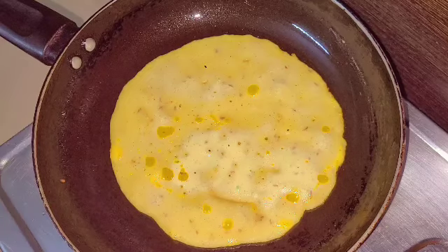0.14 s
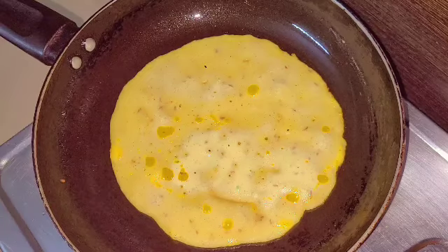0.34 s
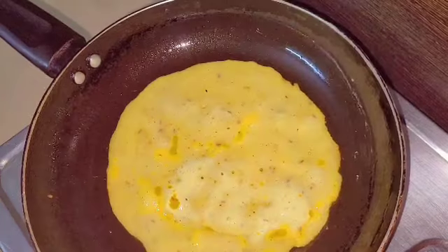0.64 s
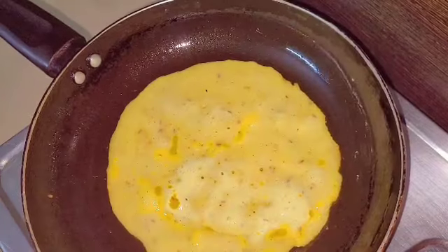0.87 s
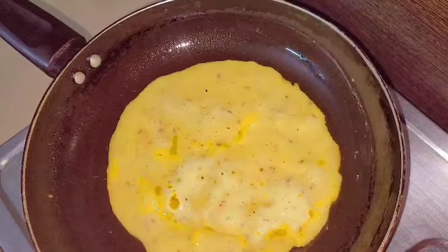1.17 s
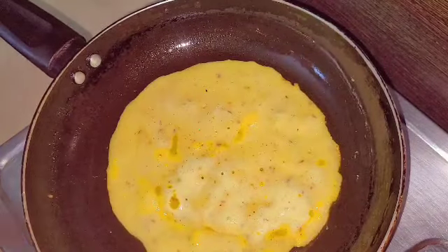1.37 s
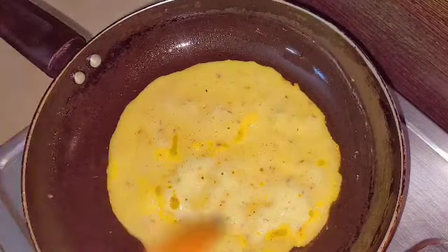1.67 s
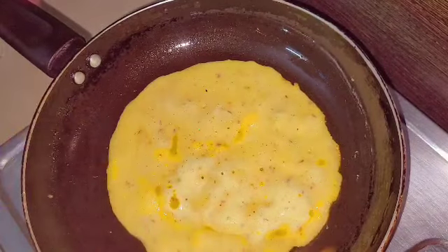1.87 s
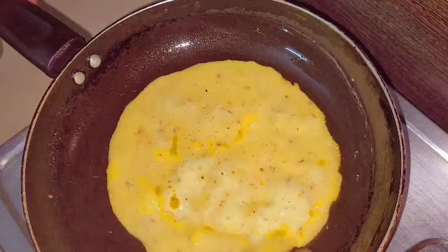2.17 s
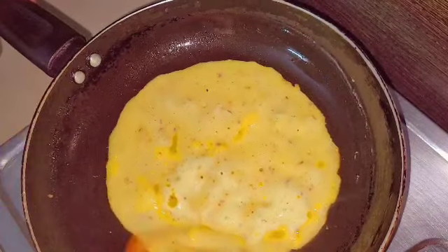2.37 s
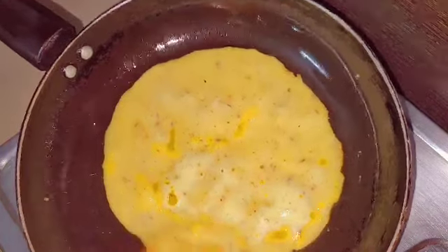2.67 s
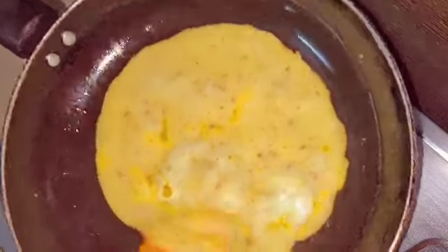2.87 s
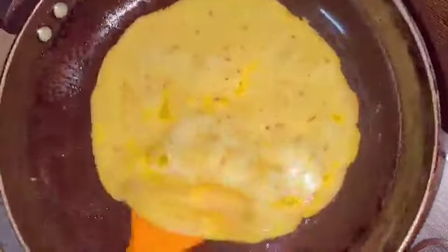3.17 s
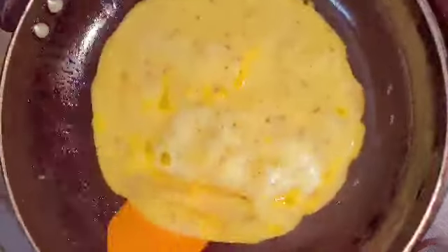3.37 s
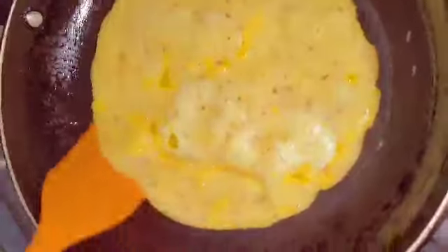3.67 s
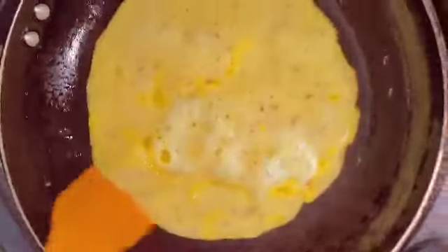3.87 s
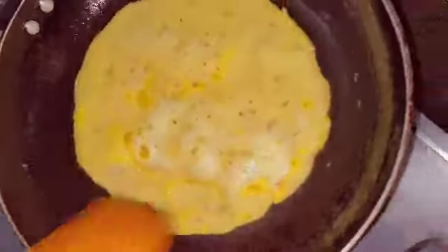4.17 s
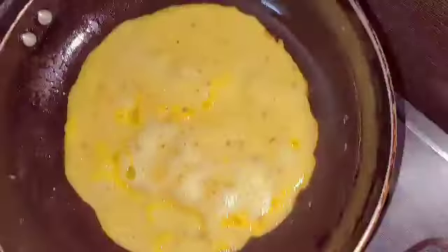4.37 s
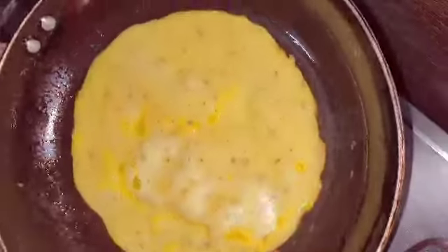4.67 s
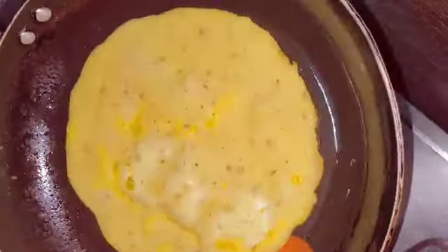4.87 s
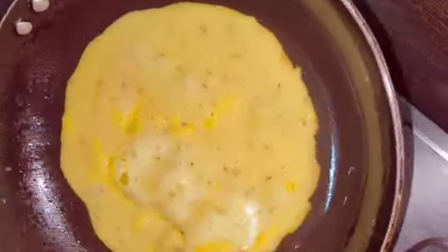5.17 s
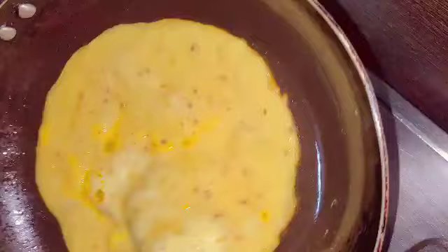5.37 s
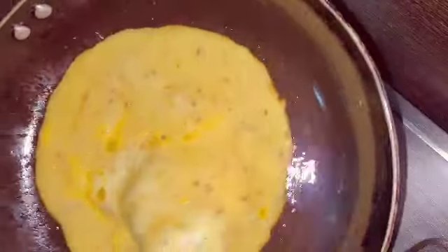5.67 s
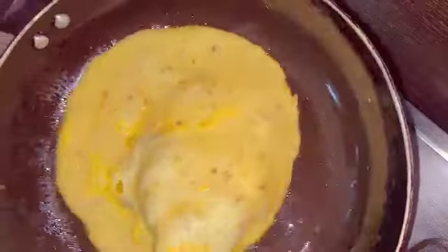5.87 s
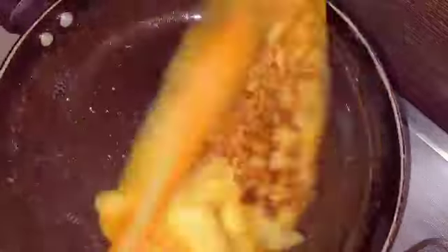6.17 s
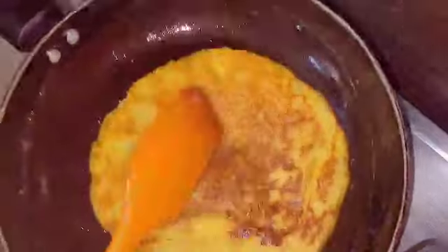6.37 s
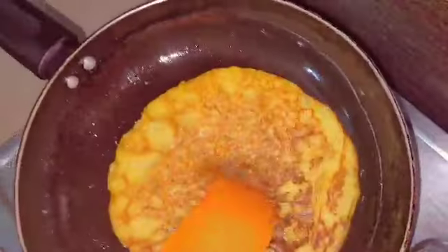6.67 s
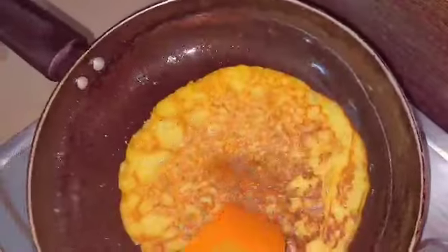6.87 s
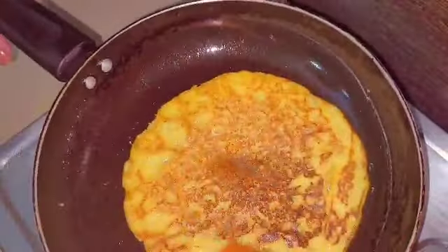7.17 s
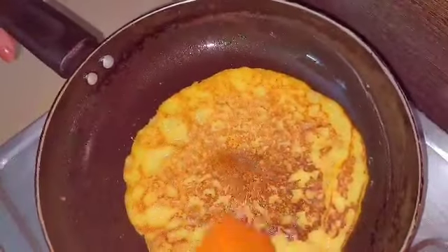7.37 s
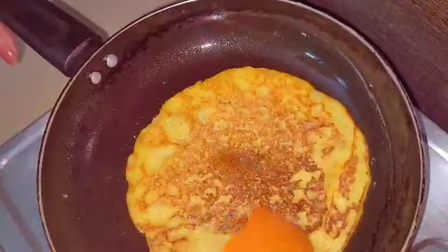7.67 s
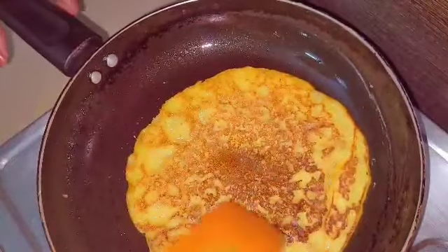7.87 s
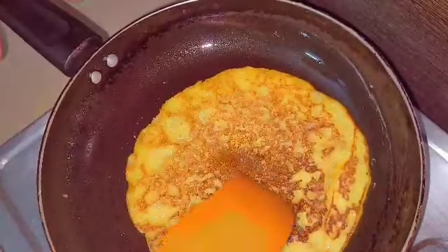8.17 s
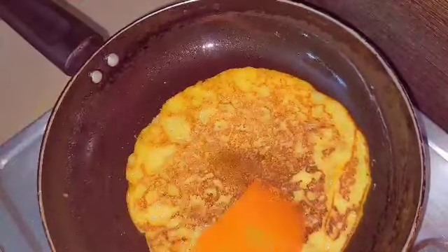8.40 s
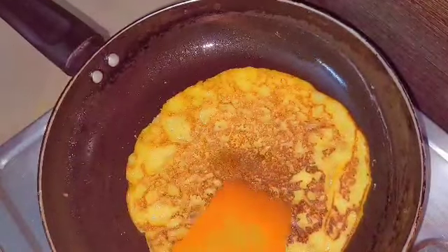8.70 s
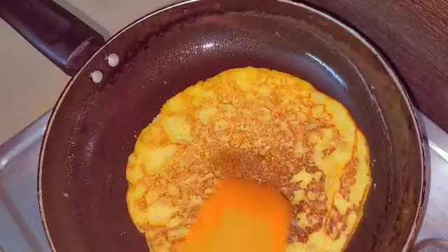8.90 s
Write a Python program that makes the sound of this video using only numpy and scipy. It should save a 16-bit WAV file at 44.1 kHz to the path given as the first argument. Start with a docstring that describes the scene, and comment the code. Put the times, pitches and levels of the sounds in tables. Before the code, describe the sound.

A pancake sizzles and spits in a pan, surges into a dense hiss under pressure, slaps over wetly, then settles to soft frying.

```python
"""Frying and flipping a pancake

A pancake fries in a little oil in a nonstick pan, heard from close above in a kitchen.
Bursting steam bubbles are tiny noise snaps in clusters; spits of oil are brighter snaps with faint puffs.
A spatula squeezes out a dense hiss, lifts the pancake and slaps it over: a quick run of noise smacks.
Decaying sines make the pan's knocks on the stove; filtered noise makes the burner's rumble below."""
import sys
import numpy as np
from scipy import signal
from scipy.fft import rfft, irfft, next_fast_len
from scipy.io import wavfile
from scipy.ndimage import uniform_filter1d, map_coordinates

SR = 44100
rng = np.random.default_rng(int(sys.argv[2]) if len(sys.argv) > 2 else 0)


def wrap_up_sound(samples):
    """Save the sound to the file named by the first command line argument, as 16-bit audio."""
    columns = np.atleast_2d(samples).T
    # keep every value between -1 and 1, then stretch to whole-number steps
    tamed = np.clip(columns, -1, 1)
    steps = np.round(tamed * 32767).astype(np.int16)
    wavfile.write(sys.argv[1], SR, steps)


N = 398663  # length [samples]

# the loudest spits of oil, before the gains of their parts: (time [s], level [dB])
SPITS = [(0.1713, -30), (0.531, -27), (0.638, -21), (0.7086, -24), (0.8321, -21), (0.9153, -22),
         (1.0365, -22), (1.0562, -25), (1.127, -26), (1.2055, -27), (1.2896, -23), (1.3868, -23),
         (1.4425, -26), (1.5121, -24), (1.0135, -28), (1.6112, -25), (1.6507, -20), (1.6631, -22),
         (1.882, -24), (1.9117, -15), (1.9736, -23), (2.0133, -24), (2.0258, -23), (2.1375, -21),
         (2.1639, -22), (2.3091, -23), (2.3299, -18), (2.3589, -22), (2.7375, -20), (2.8795, -21),
         (2.8455, -16), (2.9669, -24), (2.9784, -28), (3.056, -26), (3.2706, -28), (3.2914, -22),
         (3.3445, -18), (3.362, -19), (3.4846, -16), (3.6719, -11), (3.7211, -13), (3.9942, -16),
         (4.056, -12), (4.4372, -13), (8.7415, -29), (4.7504, -15), (4.7975, -17), (4.931, -18),
         (5.0811, -19), (5.2093, -18), (5.4453, -18), (5.5295, -22), (5.7617, -12), (5.7764, -16),
         (5.8004, -13), (5.827, -18), (5.9867, -23), (6.3199, -11), (7.6955, -27), (7.7647, -26),
         (7.9627, -24), (8.2778, -24), (8.3282, -26), (8.613, -27), (8.6486, -21), (8.8381, -25),
         (8.94, -22), (8.957, -24)]
# the spatula's weight on the pancake: (time [s], pressure [0-1])
PRESSURE = [(1.5, 0), (2.5, 0.31), (3.2, .35), (3.7, 0.9), (4.3, 0.95), (4.8, 0.61), (6.0, .55),
            (7.2, 0.48), (8.0, 0.31)]
LAND_S = 6.265  # the turned pancake lands in the pan
CATCH_S = 0.02  # time constant with which the sizzle comes up


def sizzle():
    """The same bubbles crackle at the rim, hiss where squeezed, and sound muffled or blub under the pancake."""
    # how snugly the pancake lies on the pan: (time [s], bubbling under it relative to the crackle [dB])
    contact = [(1.4, -4.5), (2.3, -7), (2.85, -9.5), (3.55, -5), (4.1, -8), (5.3, -8.5), (5.95, -12),
               (6.25, -14), (6.42, -3), (9.0, -7.5)]
    # steam pockets change as the pancake is moved; a negative depth is a lift:
    # (time [s], steam resonance [Hz], dip [Hz], depth of the dip [dB], crackle resonance [Hz])
    pockets = [(1.5, 5400, 4200, 3, 9050), (2.4, 4730, 7000, 4, 10200), (2.9, 5430, 6960, 3.5, 12100),
               (3.55, 5530, 3400, 3.5, 10690), (4.0, 5600, 3780, 6, 10690), (4.17, 5350, 3100, -0.5, 9603),
               (4.7, 4930, 7900, 3.5, 12100), (5.0, 5294, 6994, 5, 11990), (5.75, 5805, 3506, -1.5, 11950),
               (6.5, 5300, 3413, 2, 11100), (8.4, 5200, 6700, 3, 11400)]
    # colours of the bubbles: (frequency [Hz], relative level [dB])
    crackle_colour = [(2000, -34), (5000, -4.5), (7300, -7), (8800, -2), (10500, -1.5), (15300, 0.5)]
    steam_colour = [(1000, -54), (2200, -12), (3000, 1), (4000, 1.5), (5600, -1), (7500, 0), (9500, -1),
                    (14000, -16)]
    muffled_colour = [(200, -26), (550, -30), (680, -11), (900, -2), (1130, -3.5), (1500, 3), (2200, 3.5),
                      (2700, 3), (8000, -22)]
    blub_colour = [(100, -12.5), (220, -1), (320, 4), (480, -2), (700, -10.5), (1500, -33.5)]

    crackle_db, rush, touch = frying()
    # more steam = more hiss, more bubbles, less clustering: [at rest, at full rush]
    steam_db = np.interp(rush, [0, 1], [-9, -2])
    bubbles_per_s = np.interp(rush, [0, 1], [1700, 6500])
    cluster_db = np.interp(rush, [0, 1], [12.5, 2])
    # bare oil keeps only a share of the clustering
    cluster_db = cluster_db * np.maximum(touch, 0.21)

    under_db = crackle_db + curves(contact)[0]
    pressed_db = -4 * curves(PRESSURE)[0]
    flipped_db = 3.5 * (1 - fade(LAND_S, CATCH_S))
    blub_db = under_db - 6 + pressed_db + flipped_db

    steam_hz, dip_hz, dip_db, crackle_hz = curves(pockets)
    rim, squeezed, trapped, deep = bubbles(
        bubbles_per_s, cluster_db, spread_db=6.5, fizz=0.45, pop_rate=65, pop_db=23.5, count=4)
    crackle = in_pan(rim * amp(crackle_db - 1.0), crackle_colour)
    crackle = pocket(crackle, crackle_hz, dip_hz, dip_db, width_hz=2600, lift_db=3.5, patchy_db=2.1)
    hiss = in_pan(squeezed * amp(crackle_db + steam_db - 3.5), steam_colour)
    steam = pocket(hiss, steam_hz, dip_hz, dip_db, width_hz=1020, lift_db=5.5, patchy_db=1.68)
    under = in_pan(trapped * amp(under_db - 1.0), muffled_colour)
    blubs = in_pan(deep * amp(blub_db), blub_colour)
    return crackle + steam + under + blubs


def frying():
    """Strength of the frying (dB), rush of steam (0-1) and the pancake's touch on the pan (0-1)."""
    # the first side on the hot pan: (time [s], strength of the frying [dB])
    first_side_db = [(0.55, -36), (1.5, -38), (2.0, -34), (2.24, -37.5), (2.45, -34), (2.72, -26.5),
                     (2.87, -34), (3.02, -42.5), (3.33, -38.5), (3.35, -29), (4.3, -27.5), (5.2, -28.5),
                     (5.5, -31.5), (5.98, -32.5)]
    # each shove of the spatula presses out a surge of sizzle: (time [s], strength [dB], half length [s])
    shoves = [(2.334, -29, 0.029), (3.662, -22.5, 0.14), (4.11, -25, 0.3), (5.312, -25.5, 0.042),
              (5.706, -28, 0.094), (7.72, -35.5, 0.036), (8.382, -36, 0.065)]
    jump_s = 0.499  # the faint sizzle jumps up to full level
    lift_s, release_s = 5.99, 0.024  # the pancake leaves the pan; time constant of the fall
    bare_db = -52  # oil simmering alone
    flash_db, flash_s = -34, 0.045  # the raw side flashes to steam
    wet_db, dry_s, settled_db = -29, 0.8, -39  # then it dries and settles
    wet_rush = 0.9  # wet batter drives steam as pressure does

    t = np.arange(N) / SR
    first = (1 - fade(jump_s, CATCH_S)) * fade(lift_s, release_s)
    second = 1 - fade(LAND_S, CATCH_S)
    wet = fade(LAND_S, dry_s)

    shove_power = sum((amp(db) * np.exp(-((t - s) / length) ** 2)) ** 2 for s, db, length in shoves)
    first_power = first ** 2 * amp(curves(first_side_db)[0]) ** 2
    raw_power = (amp(flash_db) * fade(LAND_S, flash_s)) ** 2 + (amp(wet_db) * wet) ** 2
    second_power = second ** 2 * (raw_power + amp(settled_db) ** 2)
    power = amp(bare_db) ** 2 + first_power + shove_power + stirring() + second_power

    touch = np.clip(first + second, 0, 1)
    rush = np.clip(touch * curves(PRESSURE)[0] + wet_rush * second * wet, 0, 1)
    return 10 * np.log10(power), rush, touch


def stirring():
    """Power of the small bubbles that each spit sets off in the oil around it."""
    relative_db, decay_s = -13.5, 0.007  # level against the spit's table level; time constant of the power
    s, db = np.transpose(SPITS)
    moments = np.bincount(np.round(s * SR).astype(int), amp(db + relative_db) ** 2, N)
    return signal.lfilter([1], [1, -np.exp(-1 / (decay_s * SR))], moments)


def bubbles(rate, cluster_db, spread_db, fizz, pop_rate, pop_db, count):
    """Several streams of rms 1 that share the bubbles' moments and sizes, each with its own snap shapes."""
    starts = np.flatnonzero(rng.random(N) < rate / SR)
    sizes = amp(spread_db * np.minimum(rng.standard_normal(N), 2.3))[starts]
    common, *own = [flurries(cluster_db, rate=75, life=0.0036) for _ in range(count + 1)]
    share = 0.71  # share of the flurries common to all streams

    # now and then a bigger bubble stands out as a dry click, most of all where the boiling is sparse
    pops = np.flatnonzero(rng.random(N) < pop_rate / SR)
    pop_sizes = amp(pop_db - 11.0 * np.sqrt(rng.random(N)))
    pop_sizes = (pop_sizes * np.sqrt(rate.min() / rate))[pops]

    streams = []
    for alone in own:
        surge = np.sqrt(share * common ** 2 + (1 - share) * alone ** 2)
        snaps = unit(bursts(starts, sizes, life=0.00016))
        x = surge * (snaps + fizz * rng.standard_normal(N))
        # even out the slow level before the clicks are added
        x = x / np.sqrt(np.abs(uniform_filter1d(x * x, size=3600)) + 1e-9)
        streams.append(unit(x + bursts(pops, pop_sizes, life=0.0001)))
    return streams


def flurries(cluster_db, rate, life):
    """Loudness of little flurries of bubbles that start at once and die away."""
    triggers = (rng.random(N) < rate / SR) * rng.uniform(0.25, 2.6, N)
    activity = signal.lfilter([1], [1, -np.exp(-1 / (life * SR))], triggers)
    return np.sqrt(1 + activity * np.abs(amp(cluster_db) ** 2 - 1))


def bursts(starts, sizes, life, size=48):
    """Each bursting bubble is a tiny noise snap of its own shape, dying away with time constant life (s)."""
    snaps = rng.standard_normal((len(starts), size)) * np.exp(-np.arange(size) / SR / life)
    snaps *= (sizes / np.linalg.norm(snaps, axis=1))[:, None]
    places = starts[:, None] + np.arange(size)
    return np.bincount(places.ravel(), snaps.ravel(), N + size)[:N]


def pocket(x, pitch, dip_hz, dip_db, width_hz, lift_db, patchy_db):
    """A moving resonance and a moving dip, plus patches of colour as the boiling shifts from spot to spot."""
    hz, t, z = signal.stft(x, SR, nperseg=128)
    centre, dip, depth_db = (np.interp(t, np.arange(N) / SR, c) for c in (pitch, dip_hz, dip_db))
    # smooth random values over frequency and time
    patch_shape = np.outer(signal.windows.hann(7), signal.windows.hann(90))
    patches = unit(signal.oaconvolve(rng.standard_normal(z.shape), patch_shape, "same"))
    shape_db = lift_db * bell(hz[:, None], centre, width_hz)
    shape_db = shape_db - depth_db * bell(hz[:, None], dip, 0.42 * dip)
    return signal.istft(z * amp(shape_db + patchy_db * patches), SR, nperseg=128)[1][:N]


def spits():
    """Each spit is a bright snap with a faint puff; trapped steam breaks through the batter in louder puffs."""
    # hollow puffs of steam through the batter, before the puff gain: (time [s], level [dB])
    batter_puffs = [(0.532, -31), (0.8323, -25.5), (1.387, -29), (2.026, -25), (3.672, -20), (4.056, -24),
                    (5.081, -27), (5.8, -28), (8.838, -29)]
    # colour of the spits: (frequency [Hz], relative level [dB])
    spit_colour = [(100, -22), (400, -4), (1100, -3), (1800, 3), (3000, -1), (10000, 0)]
    snap_gain_db, spit_puff_db = 15, -17  # against the spit's table level
    puff_gain_db, puff_t60_s = 4, 0.027  # for both kinds of puff

    s, db = np.transpose(SPITS)
    snaps = filtered(spit(s, db + snap_gain_db), 2, 3200, "high")
    puffs, t = np.zeros(N), np.arange(SR // 16) / SR
    for start, puff_db in list(zip(s, db + spit_puff_db)) + batter_puffs:
        steam = amp(-60 * t / puff_t60_s) * rng.standard_normal(len(t))
        skin = 8 * (t == 0)  # a one-sample click opens the puff
        add(puffs, start, amp(puff_db + puff_gain_db) * (skin + steam))
    puffs = filtered(puffs, 2, (700, 2650), "band")
    return in_pan(snaps + puffs, spit_colour)


def spit(s, db):
    """A big bubble snaps and throws a few droplets that tick for some milliseconds."""
    moments = np.round(s * SR).astype(int)
    snaps = np.bincount(moments, amp(db), N) + bursts(moments + 2, amp(db + 2), life=0.0005)
    flight = rng.exponential(0.003, (len(s), 6))  # delays of six droplets [s]
    starts = np.minimum(np.round((s[:, None] + flight) * SR).astype(int), N - 1)
    # later droplets are softer
    sizes = amp(db[:, None] - 5 - 60 * flight / 0.05)
    return snaps + bursts(starts.ravel(), sizes.ravel(), life=0.0003)


def slap():
    """Wet batter hits the pan in a quick run of smacks, each a sharp edge with a short splash."""
    # the pancake lands fold by fold, before colouring: (time [s], level [dB])
    folds = [(6.2665, -20.5), (6.2733, -9.5), (6.280, -11), (6.284, -13), (6.289, -10)]
    # colour of the wet smack: (frequency [Hz], relative level [dB])
    splat_colour = [(30, -26), (120, -8), (270, 2.5), (500, -7.5), (740, -13.5), (960, 0), (1600, -6),
                    (3000, -4), (7000, -16), (15500, -12.5)]
    x, t = np.zeros(N), np.arange(SR // 10) / SR
    edge = amp(-60 * t / 0.0049)
    splash = 0.77 * amp(-60 * t / 0.046)
    for s, db in folds:
        add(x, s, amp(db) * rng.standard_normal(len(t)) * (edge + splash))
    return in_pan(x, splat_colour)


def rubs():
    """The blade drags softly over the cooked side: noise under a smooth swell with an uneven grip."""
    # soft strokes of the spatula, before colouring: (time [s], level [dB], half length [s])
    strokes = [(6.774, -37, 0.094)]
    t = np.arange(N) / SR
    pressure = sum(amp(db) * np.exp(-((t - s) / length) ** 2) for s, db, length in strokes)
    grip = amp(3 * wobble(60))
    colour = [(100, -2), (300, 5.0), (550, -14.5), (4000, -40)]  # (frequency [Hz], relative level [dB])
    return in_pan(pressure * grip * rng.standard_normal(N), colour)


def taps():
    """The blade's edge catches on the pan and sets off a brief, narrow, unsteady ring."""
    # catches of the edge: (time [s], level before doubling [dB], pitch [Hz], t60 [s])
    catches = [(5.329, -23, 1000, 0.072), (4.437, -26, 2980, 0.044)]
    x, t = np.zeros(N), np.arange(SR // 8) / SR
    for s, db, hz, t60 in catches:
        # a random walk of the phase makes the pitch unsteady
        drift = np.cumsum(rng.standard_normal(len(t))) * np.sqrt(0.5 * hz / SR)
        envelope = 2 * amp(db - 60 * t / t60) * (1 - np.exp(-t / 0.0008))
        add(x, s, envelope * np.sin(2 * np.pi * hz * t + drift))
    return x


def bump():
    """The blade pats the pancake: each pat is a soft thud, then the pan rocks with a low hum."""
    # pats: (time [s], level [dB])
    pats = [(8.466, -32.5), (8.572, -40.5)]
    thud_t60_s = 0.36
    rock_hz, rock_db, rock_rise_s, rock_t60_s = 93.2, 9, 0.032, 0.45  # level relative to the pat
    x, t = np.zeros(N), np.arange(SR // 2) / SR
    rock = amp(rock_db - 60 * t / rock_t60_s) * (1 - np.exp(-t / rock_rise_s))
    rock = rock * np.sin(2 * np.pi * rock_hz * t)
    for s, db in pats:
        thud = unit(filtered(rng.standard_normal(len(t)), 2, [170, 680], "band"))
        add(x, s, amp(db) * (amp(-60 * t / thud_t60_s) * thud + rock))
    return x


def knocks():
    """The pan knocks on the stove: dull blows ring both, and softer ones lose their upper modes."""
    # blows: (time [s], level [dB], hardness as a corner [Hz])
    blows = [(2.437, -13.5, 960), (2.488, -33, 800), (7.1402, -14.5, 1200), (7.1838, -22.5, 700),
             (7.325, -28, 880)]
    # pan and stove top ringing together: (frequency [Hz], level [dB], t60 before the flip [s])
    stove = [(50.3, -13.5, 0.2), (97.6, -14.5, 0.23), (207, -9, 0.2), (234.8, -6.5, .44), (308.3, -7, 0.32),
             (329.2, 3.5, .16), (394, -12, 0.22), (457, -11.5, .2), (548, -12, 0.14), (570.5, -10, 0.25),
             (612, -9, 0.2), (740, -5.5, 0.092), (798, -3, 0.08), (834, -5, .085), (950, -8.5, 0.093),
             (1298, -4.5, 0.096)]
    x, t = np.zeros(N), np.arange(SR // 2) / SR
    hz, mode_db, t60 = np.transpose(stove)[:, :, None]
    # a mode with t60 = 0.09 s swells with a 1.5 ms time constant, longer ones more slowly
    swell = 1 - np.exp(-t / (0.0015 * (t60 / 0.09) ** 2))
    for s, db, corner_hz in blows:
        linger = 1.21 if s > LAND_S else 1  # rings longer once the pancake is turned
        strength = amp(mode_db) / np.sqrt(1 + (hz / corner_hz) ** 14)
        ring = strength * swell * amp(-60 * t / (t60 * linger)) * np.sin(2 * np.pi * hz * t)
        rattle = unit(filtered(rng.standard_normal(len(t)), 6, [50, corner_hz], "band"))
        rattle = 0.2 * rattle * amp(-60 * t / (0.22 * linger))
        add(x, s, amp(db) * (ring.sum(0) + rattle))
    return x


def burner():
    """The burner is a low, fluttering rumble: noise squeezed into a few narrow low bands."""
    # level of the rumble before a 3 dB lift: (time [s], level [dB])
    rumble_db = [(0.15, -51.5), (.55, -43), (1.9, -44), (2.2, -44.5), (8.85, -47), (9.0, -42.5)]
    # colour of the rumble: (frequency [Hz], relative level [dB])
    roar = [(25, -28), (40, -16.5), (52, -21), (63, -10.5), (74, 7.5), (83, -10.5), (94, 5.5), (106, -2),
            (140, -6), (175, -17), (300, -12), (400, -26), (4000, -65)]
    rumble = unit(coloured(rng.standard_normal(N), lambda hz: along(roar, hz)))
    return amp(curves(rumble_db)[0] + 3) * rumble


def kitchen(x, room_db):
    """One quick echo off the pan's wall, then the short tail of the room, made of dying noise."""
    # how long the room rings: (frequency [Hz], t60 [s])
    room_t60 = [(200, 0.32), (2000, 0.23), (12000, 0.058)]
    hz, t, z = signal.stft(rng.standard_normal(SR // 2), SR, nperseg=256)
    tail = signal.istft(z * amp(-60 * t / along(room_t60, hz)[:, None]), SR, nperseg=256)[1]
    tail = np.pad(tail / np.linalg.norm(tail), (SR // 250, 0))  # starts after 4 ms
    room = signal.oaconvolve(x, tail)[:N]
    treble = filtered(x, 2, 3000, "high")
    echo = 0.22 * np.pad(treble, (round(0.0021 * SR), 0))[:N]
    return x + echo + amp(room_db) * room


def in_pan(x, spectrum):
    """A colour with the pan's resonances on top."""
    # resonances of the pan: (frequency [Hz], width [Hz], lift [dB])
    pan_modes = [(378, 150, 3.5), (572, 125, 15), (790, 99, 12.5), (947, 51, 6.5), (1007, 116, 11),
                 (1244, 24, 5.5), (1291, 98, 6), (1397, 140, 7), (1602, 37, 4), (1784, 210, 7),
                 (2104, 130, 5.5), (2250, 73, 6)]

    def gain_db(hz):
        return along(spectrum, hz) + sum(db * bell(hz, f, width) for f, width, db in pan_modes)
    return coloured(x, gain_db)


def coloured(x, gain_db, size=8192):
    """A causal filter of unit energy whose shape in dB is a function of frequency."""
    # folding the cepstrum puts the energy as early as possible
    cepstrum = irfft(np.log(amp(gain_db(np.fft.rfftfreq(size, 1 / SR))) + 1e-6))
    cepstrum[1:size // 2] *= 2
    cepstrum[size // 2 + 1:] = 0
    response = irfft(np.exp(rfft(cepstrum)))
    return signal.oaconvolve(x, response / np.linalg.norm(response))[:N]


def filtered(x, order, edge_hz, kind):
    """A smooth high-pass or band-pass filter."""
    return signal.sosfilt(signal.butter(order, edge_hz, kind, fs=SR, output="sos"), x)


def bell(hz, centre, width):
    """The shape of one resonance, 1 at its centre."""
    return 1 / (1 + (2 * (hz - centre) / width) ** 2)


def fade(s, life):
    """1 until time s, then an exponential decay with time constant life (s)."""
    return np.exp(-np.maximum(np.arange(N) / SR - s, 0) / life)


def wobble(rate):
    """A smooth random curve, rate knots a second."""
    knots = rng.standard_normal(int(N * rate / SR) + 4)
    return map_coordinates(knots, [np.arange(N) * rate / SR], order=2)


def curves(rows):
    """One value per sample for each column after the time."""
    s, *cols = np.transpose(rows)
    return [np.interp(np.arange(N) / SR, s, c) for c in cols]


def along(points, hz):
    """Values between (Hz, value) points on a log frequency axis."""
    f, v = np.transpose(points)
    return np.interp(np.log(hz + 1), np.log(f + 1), v)


def add(track, s, sound):
    """Mix a sound into a track at time s."""
    part = track[round(s * SR):][:len(sound)]
    part += sound[:len(part)]


def amp(db):
    """Decibels to an amplitude factor."""
    return 10 ** (np.asarray(db) / 20)


def unit(x):
    """Scale to an rms of 1."""
    return x / np.sqrt(np.mean(x ** 2) + 1e-20)


def scene():
    """Everything in the pan sounds in the kitchen, with the burner below."""
    pan = sizzle() + spits() + slap() + rubs() + taps() + bump() + knocks()
    return kitchen(pan, room_db=-14.0) + burner()


def record(dry):
    """A very steep filter removes the treble above the band limit."""
    top_hz = 15550
    size = next_fast_len(N + SR // 4)
    hz = np.fft.rfftfreq(size, 1 / SR)
    return irfft(rfft(dry, size) / np.sqrt(1 + (hz / top_hz) ** 200), size)[None, :N]


dry = scene()
out = record(dry)
wrap_up_sound(out)
```